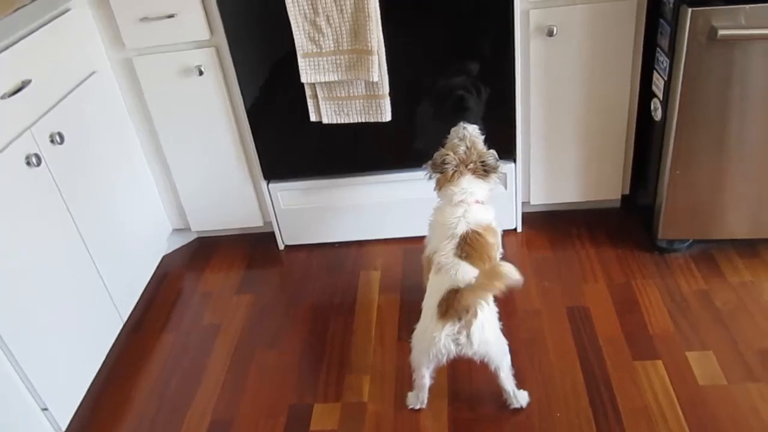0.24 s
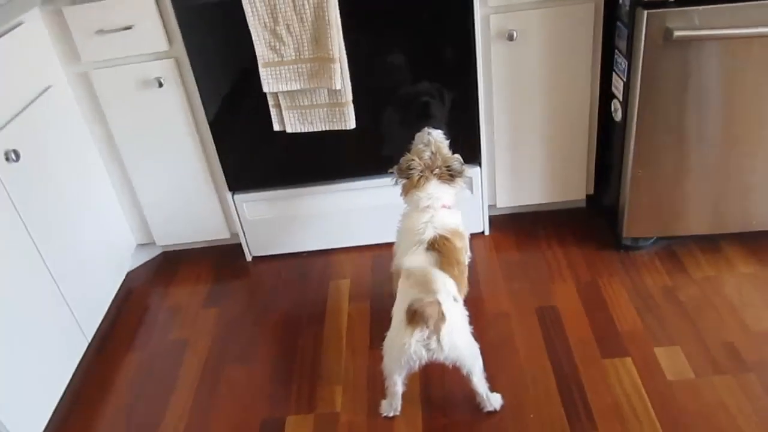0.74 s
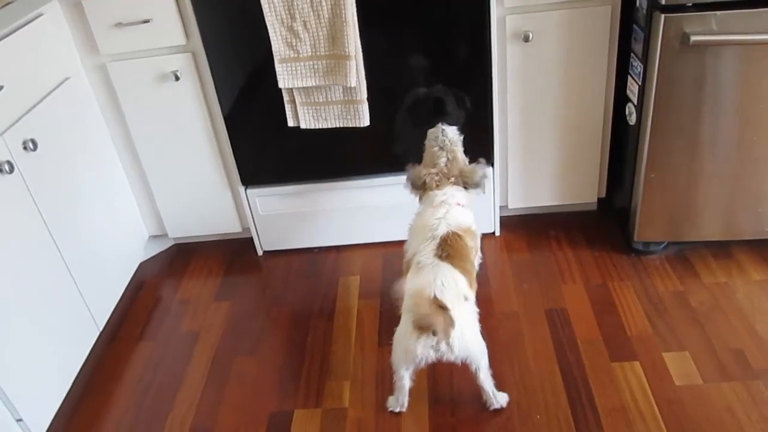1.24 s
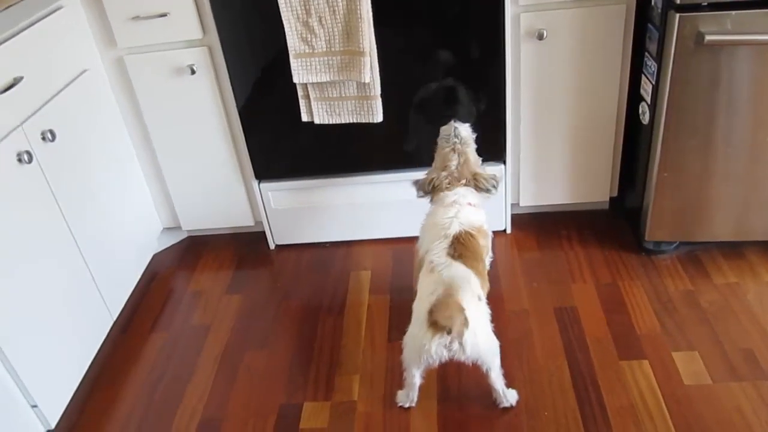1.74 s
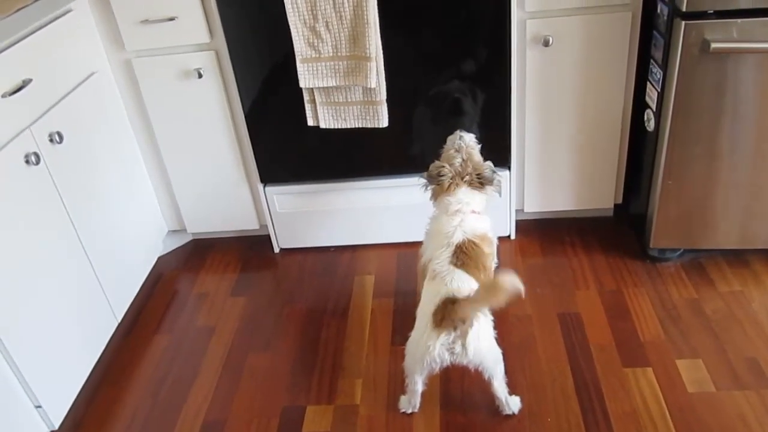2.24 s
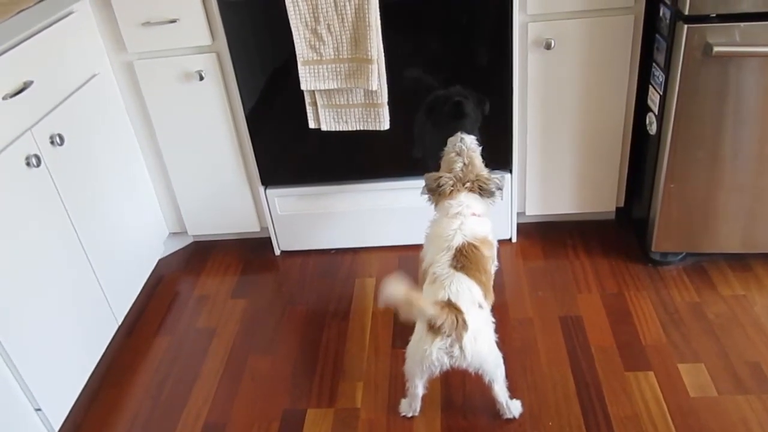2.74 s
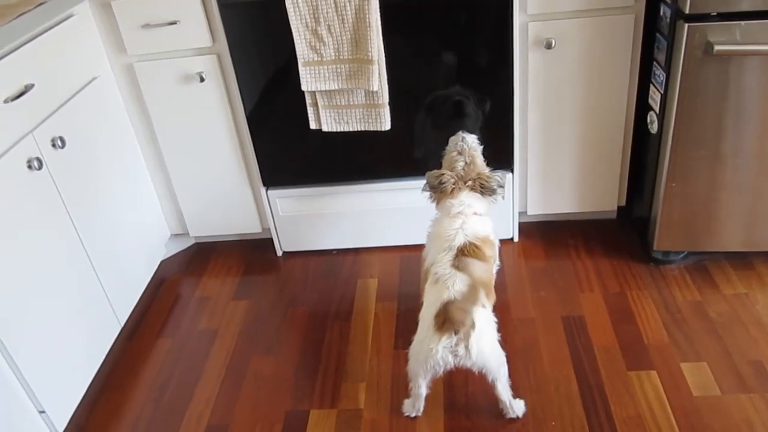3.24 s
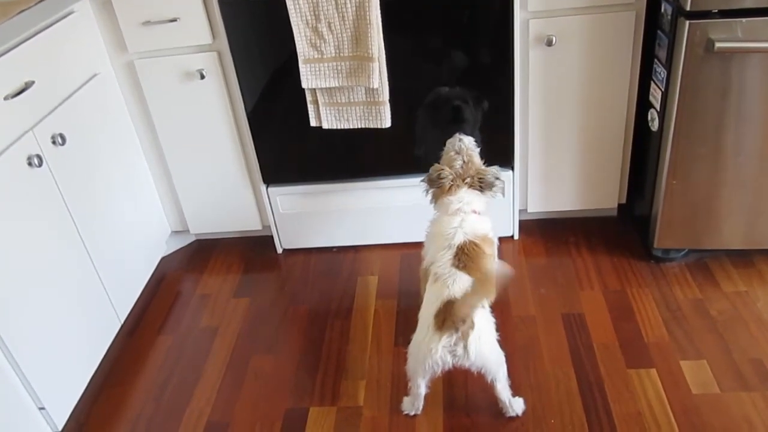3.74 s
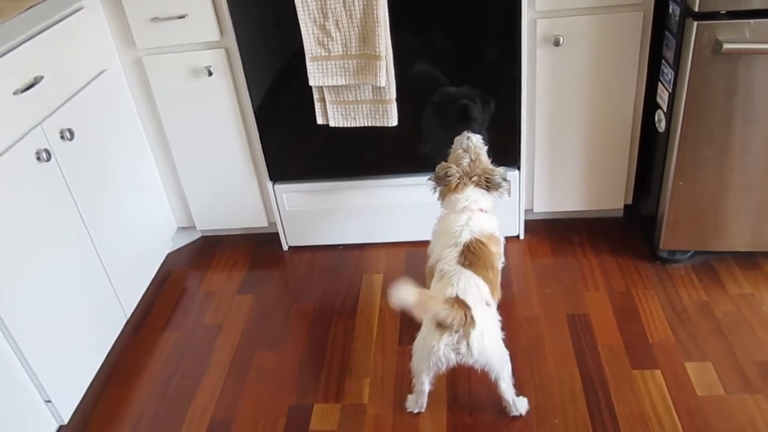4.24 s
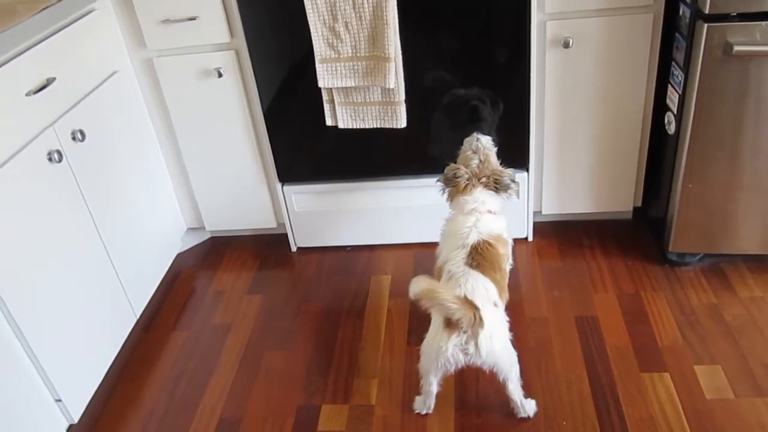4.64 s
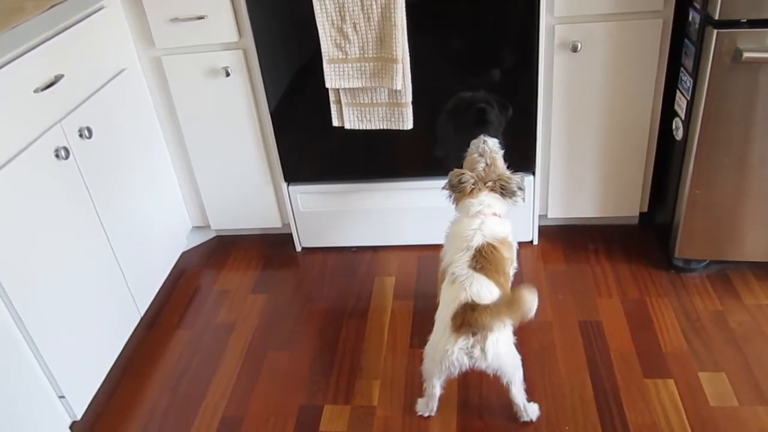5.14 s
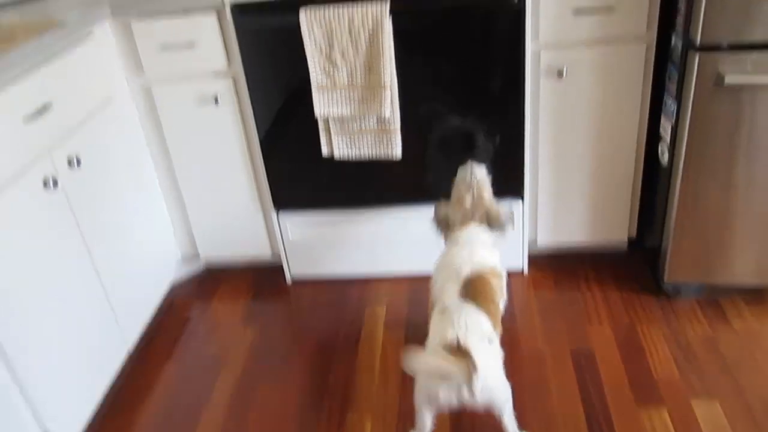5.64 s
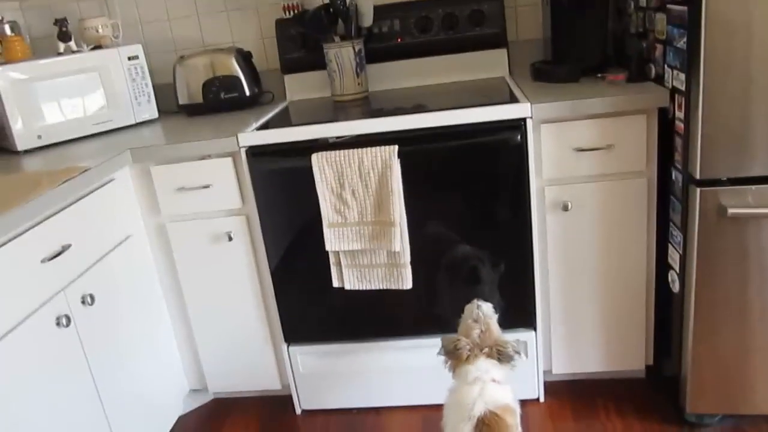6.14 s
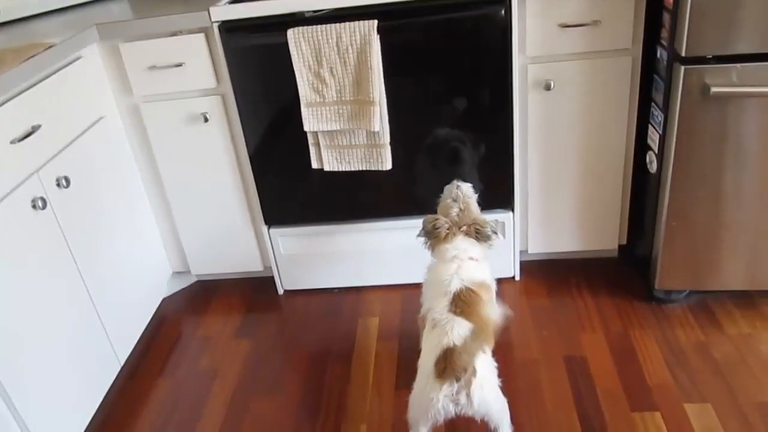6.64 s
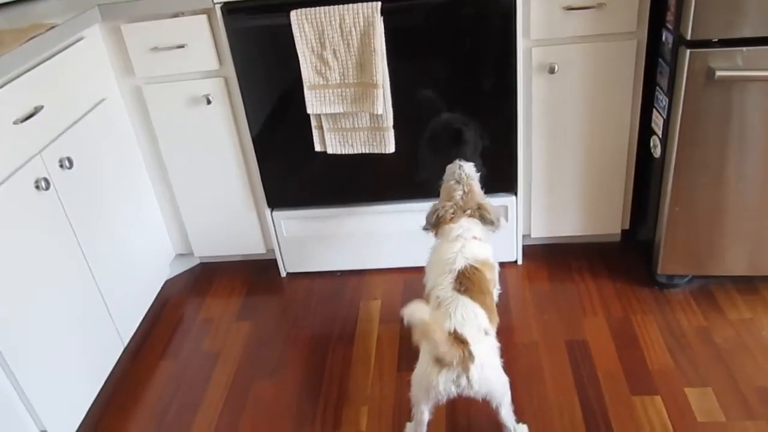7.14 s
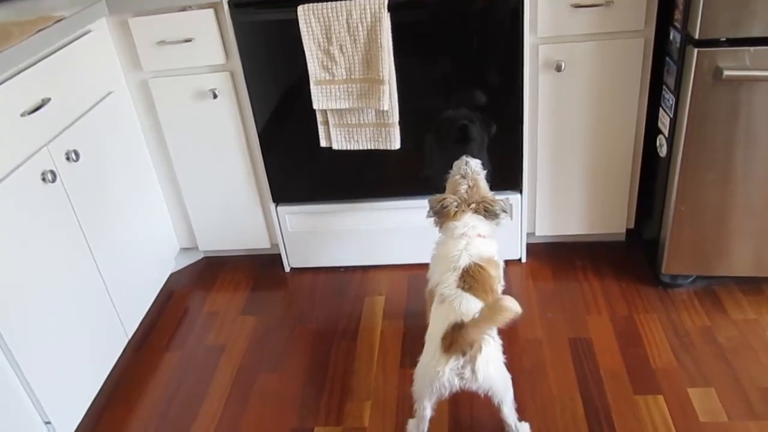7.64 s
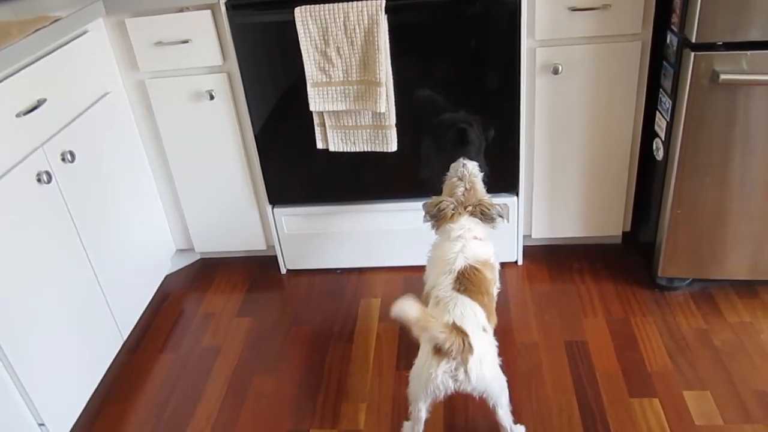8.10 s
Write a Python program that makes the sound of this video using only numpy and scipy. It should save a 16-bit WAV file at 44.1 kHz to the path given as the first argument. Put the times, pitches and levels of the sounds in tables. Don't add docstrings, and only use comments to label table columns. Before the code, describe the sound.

Two soft huffs and faint handling bumps open over low room tone. A small dog growls slowly and creakily, speeding into a rough rattle, and barks hoarsely; a lone bark comes after. Three further growls each end in a loud, raspy bark, ringing briefly off hard kitchen surfaces. Faint breaths and distant low hums fill the gaps, and the last growl stops mid-way. Close, nearly mono handheld pickup.

```python
import sys
import numpy as np
from scipy import signal
from scipy.fft import rfft, irfft, next_fast_len
from scipy.io import wavfile
from scipy.ndimage import uniform_filter1d, minimum_filter1d, map_coordinates

SR = 44100
rng = np.random.default_rng(int(sys.argv[2]) if len(sys.argv) > 2 else 0)


def elevation(decibels):
    levels = np.asarray(decibels, float)
    return 10 ** (levels / 20)


def to_wav(s):
    ch = np.atleast_2d(s).T
    pcm = np.round(np.clip(ch, -1, 1) * 32767)
    wavfile.write(sys.argv[1], SR, pcm.astype(np.int16))


N = 369116

# time in seconds, effort in dB, lips (-1 drawn back to 1 rounded), lip resonance in Hz.
GROWLS = [
    [(0.678, -41, -2, 1450), (0.86, -39, -2.1, 1415), (1.06, -22, -0.46, 1450), (1.2, -35.5, 0.83, 1526),
     (1.255, -19, 0.036, 1580)],
    [(2.345, -42.5, -0.3, 1730), (2.4, -31, -0.014, 1780), (2.79, -27.5, 1, 1450), (2.815, -18, 0.71, 1382),
     (2.89, -23, 0.98, 1300), (2.95, -23.5, 0.94, 1355), (3.35, -27.5, 0.81, 1372),
     (3.435, -22, 0.49, 1328)],
    [(4.093, -35, 0.19, 1420), (4.3, -26.5, 0.15, 1350), (4.45, -24, -0.22, 1390), (4.74, -25, 0.22, 1590),
     (4.92, -22.5, 0.93, 1604), (5.5, -20.5, 0.89, 1482), (5.675, -19.5, 0.93, 1505)],
    [(6.28, -39, -2, 1450), (6.39, -27.5, -0.57, 1450), (6.64, -25, -1.68, 1450), (6.9, -23.5, -0.3, 1437),
     (7.04, -25.5, 0.82, 1444)],
    [(7.668, -35, -2, 1450), (7.76, -32.5, -1.84, 1450), (7.9, -29, -2.3, 1394), (7.96, -25, -1, 1400),
     (8.03, -32, -1.5, 1420), (8.15, -26, -0.6, 1450), (8.27, -22, 0.1, 1460), (8.37, -23.5, 0.85, 1484)],
]


def unit(x):
    return x / np.sqrt(np.mean(x ** 2) + 1e-20)


def along(points, hz):
    f, v = np.transpose(points)
    return np.interp(np.log(hz + 1), np.log(f + 1), v)


def curves(rows):
    s, *cols = np.transpose(rows)
    return [np.interp(np.arange(N) / SR, s, c) for c in cols]


def spans(calls):
    return [(c[0][0], c[-1][0]) for c in calls]


def wobble(rate):
    return map_coordinates(rng.standard_normal(int(N * rate / SR) + 4), [np.arange(N) * rate / SR])


def sounding(times, attack_s, release_s):
    t = np.arange(N) / SR
    total = 0
    for start, end in times:
        rise = (t - start) / attack_s + 0.034
        fall = 1 - (t - end) / release_s
        total = total + (t >= start) * np.clip(np.minimum(rise, fall), 0, 1)
    return total


def filtered(x, response):
    m = next_fast_len(N + SR // 2)
    return irfft(rfft(x, m) * response(np.fft.rfftfreq(m, 1 / SR)), m)[..., :N]


def modes(table, f):
    total = 0
    for k, (centre, width, db) in enumerate(table):
        ring = 1j * f * width / (centre * centre - f * f + 1j * f * width)
        total = total + (-1) ** k * elevation(db) * ring
    return total


def tract(x, table, low_hz, high_hz):
    def response(f):
        low_cut = (1j * f / (1j * f + low_hz)) ** 2
        return modes(table, f) * low_cut / (1 + 1j * f / high_hz) ** 3
    return unit(filtered(x, response))


def gliding(x, hz, width_hz):
    turn = np.exp(2j * np.pi * np.cumsum(hz) / SR)
    pole = np.exp(-np.pi * width_hz / SR)
    return unit(np.real(turn * signal.lfilter([1], np.convolve([1, -pole], [1, -pole]), x / turn)))


def throat(rate_hz, marked, jitter, scatter_db, breath, puff_s):
    cycles = np.cumsum(rate_hz) / SR
    exact = np.array([int(s * SR) for s, db in marked])
    for i in np.sort(exact):
        cycles[i:] -= cycles[i] % 1
    at = np.flatnonzero(np.diff(np.floor(cycles)) > 0)
    luck = rng.standard_normal((4000, 2))[:len(at)]
    late = np.abs(luck[:, 0] * jitter[at]) * SR / rate_hz[at]
    pulses = np.bincount(np.minimum(at + late.astype(int), N - 1), elevation(scatter_db * luck[:, 1]), N)
    for i in exact:
        pulses[i - int(.6 * SR / rate_hz[i]):i] = 0
    pulses[exact] = elevation([db for s, db in marked])
    puffs = signal.lfilter([1], [1, -np.exp(-1 / (puff_s * SR))], pulses)
    air = puffs * rng.standard_normal(N) / np.sqrt(rate_hz)
    pulses = pulses / np.sqrt(rate_hz)
    return np.sqrt(1 - breath) * unit(pulses) + np.sqrt(breath) * unit(air)


def background(loud):
    # frequency in Hz, level in dB per Hz.
    tone_colour = [(12, -51.5), (20, -1.5), (95, -8.5), (157, -8), (204, -6), (280, -5), (395, -10.5),
                   (475, -7.5), (969, -21.5), (1690, -23), (2140, -27.5), (3100, -27), (9300, -35),
                   (11000, -39.5), (14300, -47.5), (22000, -120)]
    # frequency in Hz, level in dB per Hz.
    rumble_colour = [(12, -41), (20, -18.5), (64, 6), (97, 3), (160, 1.5), (210, -27), (350, -120)]
    # time in seconds, level in dB.
    thumps = [
        (0.301, -44),
        (0.751, -38.5),
        (1.629, -57),
    ]
    t = np.arange(N) / SR
    level_db = 10 * np.log10(np.abs(uniform_filter1d(loud ** 2, 900)) + 1e-12)
    recovery_db = 11 * t
    duck_db = np.maximum(np.maximum.accumulate(1.89 * (level_db + 16) + recovery_db) - recovery_db, 0)
    tone = unit(filtered(rng.standard_normal(N), lambda f: elevation(along(tone_colour, f)))) * elevation(-50 - duck_db)
    rumble = unit(filtered(rng.standard_normal(N), lambda f: elevation(along(rumble_colour, f))))
    strain = elevation(-46.5) * sounding(spans(GROWLS), 0.54, 0.21)
    hands = sum(elevation(db) * (t > s) * np.exp(-np.abs(t - s) / 0.12) for s, db in thumps)
    return tone + rumble * (elevation(-64 - duck_db) + elevation(-4.5) * (strain + hands))


def drones():
    # start in seconds, end in seconds, pitch in Hz, pitch wander in Hz, level in dB.
    hums = [
        (3.55, 4.85, 77, 1.2, -51),
        (5.904, 6.716, 123, 6, -61),
        (7.125, 7.81, 129.1, 6, -66),
    ]
    t = np.arange(N) / SR
    total = 0
    for start, end, hz, width, db in hums:
        swell = np.sin(np.pi * np.clip((t - start) / (end - start), 0, 1)) ** 0.5
        total = total + elevation(db) * swell * np.sin(2 * np.pi * np.cumsum(hz + width * wobble(11)) / SR)
    return total


def huffs():
    # start in seconds, level in dB, fading time in seconds.
    puffs = [
        (0.076, -46, 0.019),
        (0.369, -44.5, 0.03),
        (2.025, -40.5, 0.024),
        (3.787, -46, 0.029),
        (6.006, -53.5, 0.11),
        (7.338, -51, 0.045),
    ]
    t = np.arange(N) / SR
    shape = 0
    for start, db, length in puffs:
        age = np.maximum(t - start, 0)
        shape = shape + elevation(db) * (1 - np.exp(-age / 0.0063)) * np.exp(-age / length)
    # frequency in Hz, width in Hz, level in dB.
    mouth = [(720, 53, 12), (1920, 180, -1.5), (2200, 110, 1.5), (3380, 260, -4.5), (7800, 1100, -14)]
    return shape * tract(rng.standard_normal(N), mouth, 300, 30000)


def growl():
    # frequency in Hz, width in Hz, level in dB.
    chest = [(214, 63, -5.5), (433.6, 145, -2.5), (668, 120, 5.5), (853, 74, -4.5)]
    # frequency in Hz, width in Hz, level in dB.
    palate = [(1000, 220, 16), (3270, 150, 1), (3810, 130, 2)]
    # frequency in Hz, width in Hz, level in dB.
    breath_bands = [(3066, 580, 14), (3500, 1900, 8.5)]
    # time in seconds, extra level in dB.
    catches = [(.718, -2), (.757, 1), (.8, 1.5), (.876, 8.5), (.996, -6.5), (2.378, 1.5), (2.702, 0.5),
               (2.806, 4), (2.886, 6.5), (2.9, 2), (2.93, 0.5), (3.202, 4.5), (3.267, 7), (4.173, 3.5),
               (4.306, 5), (4.322, 1), (4.394, 4.5), (4.423, 2), (4.44, 2.5), (4.499, 1), (4.582, 5.5),
               (4.655, 0), (4.703, 2.5), (4.718, 8), (5.127, -0.5), (6.305, -1.5), (6.708, 4), (7.753, 7.5),
               (7.857, 3.5), (7.955, 0.5), (8.04, 5), (8.108, 10.5), (8.131, 2.5)]
    # tongue in Hz at the start, at the end, then three rasp bands in Hz.
    mouths = [(2300, 2080, 6950, 8300, 9800), (1960, 2850, 7050, 7850, 9000),
              (1980, 2450, 6900, 7800, 9230), (2110, 2110, 6700, 8050, 9550),
              (2170, 2100, 6850, 8400, 10500)]
    # time in seconds, resonance in Hz.
    larynx = [
        [(0.7, 587), (0.756, 634), (1.072, 596), (1.112, 640), (1.18, 540), (1.224, 506), (1.25, 524)],
        [(2.36, 654), (2.58, 566), (2.61, 513), (2.752, 616), (3.292, 582), (3.354, 505), (3.43, 609)],
        [(4.1, 620), (4.546, 670), (4.58, 717), (4.698, 607), (4.75, 708), (4.83, 586), (5.67, 580)],
        [(6.29, 671), (6.79, 615), (6.864, 698), (6.974, 615), (7.04, 626)],
        [(7.68, 680), (7.832, 584), (7.864, 650), (8.218, 599), (8.314, 705), (8.36, 696)],
    ]
    # time in seconds, level in dB.
    tongue_shows = [(.68, -3), (.98, -2), (1.1, -15), (2.35, 8), (2.63, 11), (2.68, -5.5), (3.4, -4),
                    (4.1, 2.5), (4.4, -0.5), (4.7, -8.5), (4.86, 3), (4.95, -3), (5.67, -0.5), (6.28, 3.5),
                    (6.7, -3), (7.04, -3), (7.67, 3.5), (7.9, 0), (8.02, -6), (8.37, 9)]
    first_hz = [25.083, 33.08, 40.21, 42.9, 35.04]
    # palate ring, whole rasp, highest rasp band, all in dB.
    palate_shows = [4, -1.5, 4, 6, 5.5]
    rasp_shows = [0.5, -1.9, 0.74, 1.4, 1.5]
    top_rasp_shows = [0, 0, 4.5, 0.5, 2.5]

    effort_db, lips, lip_hz = curves(np.concatenate(GROWLS))
    times, t = spans(GROWLS), np.arange(N) / SR
    mouth_rows = []
    for span, mouth in zip(times, mouths):
        mouth_rows += [(s, mouth[k], *mouth[-3:]) for k, s in enumerate(span)]
    tongue_hz, *rasp_hz = curves(mouth_rows)
    larynx_hz, = curves(np.concatenate(larynx))
    tongue_db, = curves(tongue_shows)

    starts = np.transpose(times)[0]
    which = np.maximum(np.searchsorted(starts, t) - 1, 0)
    age = np.maximum(t - starts[which], 0)
    full_hz, speed_up_s = 86.26, .5
    rate_hz = full_hz - (full_hz - np.array(first_hz)[which]) * np.exp(-age / speed_up_s)
    jitter = np.clip((rate_hz - 22.63) * .009, 0, .4)
    marked = [(start, 0) for start, end in times] + catches
    source = throat(rate_hz, marked, jitter, scatter_db=1.14, breath=0.35, puff_s=0.021)
    source = source * sounding(times, 1e-4, 0.019)

    pushed = source * elevation(effort_db)
    larynx_ring = gliding(gliding(pushed, larynx_hz, 270), larynx_hz, 260)
    body = 0.5 * (tract(pushed, chest, 150, 1327) + 0.65 * larynx_ring)
    body = body * np.sqrt(np.mean((sounding(times, 1e-4, 0.018) * elevation(effort_db)) ** 2))

    swirl = signal.lfilter([1], [1, -np.exp(-1 / (.005 * SR))], np.abs(source))
    source = unit(source) + 1.1 * unit(swirl * rng.standard_normal(N))
    body = body + elevation(effort_db - 45.5) * tract(source, breath_bands, 2100, 5000)

    bands = []
    for hz in rasp_hz:
        drifting_hz = hz * (1 + .014 * wobble(5))
        band = gliding(gliding(source, drifting_hz, 600), drifting_hz, 600)
        bands.append(elevation(3 * wobble(6.7)) * band)
    low, middle, high = bands
    rasp = low + elevation(-6) * middle + elevation(np.array(top_rasp_shows)[which]) * high

    front = elevation(-47.5 + 23.5 * lips + 3 * wobble(14)) * gliding(source, lip_hz, 150)
    tongue = elevation(-38.5 - 9.5 * lips + tongue_db + 4.7 * wobble(11)) * gliding(source, tongue_hz, 110)
    roof = elevation(-34 + np.array(palate_shows)[which] - 4.5 * lips) * tract(source, palate, 710, 8100)
    rasp = elevation(-45 + np.array(rasp_shows)[which] - 4 * lips) * rasp

    def hollow(f):
        side_cavity = 1 - .75 * np.exp(-((f - 5200) / 900) ** 4)
        return side_cavity / (1 + (f / 10000) ** 24)
    return filtered(body + elevation(effort_db) * (front + tongue + roof + rasp), hollow)


def bark():
    # time in seconds, effort in dB, main resonance in Hz, mouth opening in dB.
    barks = [
        [(1.262, -24.5, 575, -23), (1.278, -14, 635, -20.5), (1.305, -12.5, 625, -9.5),
         (1.345, -22, 606, -12.5), (1.36, -21.5, 569, -8), (1.374, -18, 580, -18), (1.41, -19, 580, -11.5),
         (1.452, -29, 590, -6.5)],
        [(1.745, -33.5, 720, -19), (1.762, -24.5, 768, -11), (1.79, -21, 594, -8.5), (1.835, -17, 651, -16),
         (1.856, -35, 562, -5), (1.888, -21.5, 780.8, -18), (1.915, -26.5, 610, -11), (1.97, -39, 535, -15.5)],
        [(3.443, -18, 624, -14.5), (3.463, -11, 644, -13), (3.486, -20, 559.3, -13), (3.52, -14.5, 651, -9),
         (3.548, -20, 587, -7), (3.564, -19.5, 593, -9), (3.61, -33.5, 596.4, -16)],
        [(5.682, -13, 730, -20), (5.712, -19, 806, -13), (5.74, -18, 580, -7.5), (5.77, -23, 776, -3.5),
         (5.786, -17, 580, -17), (5.818, -20.5, 581.3, -14), (5.865, -30, 573.3, -6), (5.895, -42, 635, -3)],
        [(7.048, -32, 696.4, -40), (7.058, -15.5, 635.7, -22), (7.095, -15.5, 595, -10),
         (7.135, -23.5, 639.7, -2.5), (7.158, -14.5, 575, -20), (7.19, -29.5, 580, 3), (7.225, -22, 580, -15),
         (7.255, -37.5, 580, -6)],
    ]
    # frequency in Hz, width in Hz, level in dB.
    jaw = [(447, 213, -0.5), (598, 522, -2), (864, 275, -8.5)]
    # frequency in Hz, width in Hz, level in dB.
    gape = [(939, 342, 3), (1450, 836, 0.5), (2060, 2100, -8)]
    # frequency in Hz, width in Hz, level in dB.
    teeth = [(3300, 200, -6), (3850, 220, -6), (4660, 200, 2), (6200, 320, -4), (7050, 400, -4),
             (7900, 700, -2), (8900, 700, -3), (11100, 800, -6), (13100, 300, -8)]
    # share of its length, rasp in dB, cheek ring in dB.
    course = [(0, -51, -59), (.12, -24.5, -56), (0.28, -16, -46), (.5, -27, -21.5), (0.578, -23, -30),
              (.78, -33, -57), (1.001, -34.5, -51)]
    # rasp over the shared course, its gain from start to end, both in dB.
    raspiness_db = [-1.6, -3.5, 2, 1, 2]
    rasp_bloom_db = [2.3, 3.6, 2.6, 3.4, 4.8]
    # time in seconds, resonance in Hz.
    gaping = [
        [(1.27, 1220), (1.34, 1038), (1.39, 1130), (1.45, 1350)],
        [(1.75, 1206), (1.8, 1435), (1.825, 1030), (1.96, 1000)],
        [(3.45, 1346), (3.5, 990), (3.55, 1240), (3.61, 1023)],
        [(5.69, 1550), (5.745, 1213), (5.784, 1002), (5.832, 1195), (5.89, 1014)],
        [(7.06, 1570), (7.095, 1620), (7.12, 1020), (7.19, 1260), (7.25, 1053)],
    ]
    # time in seconds, level in dB.
    groans = [
        (1.275, -47.5),
        (1.501, -49),
        (1.79, -51.5),
        (3.665, -47),
        (5.9, -52),
        (7.279, -45.5),
        (7.341, -67),
    ]

    effort_db, main_hz, gape_db = curves(np.concatenate(barks))
    mouth_hz, = curves(np.concatenate(gaping))
    times, t = spans(barks), np.arange(N) / SR
    rows = []
    for (start, end), more, bloom in zip(times, raspiness_db, rasp_bloom_db):
        for u, rasp, cheek in course:
            rows.append((start + u * (end - start), u, rasp + more + bloom * (u - .5), cheek))
    share, rasp_db, cheek_db = curves(rows)

    rate_hz = 316 * (1.12 - .3 * share)
    marked = [(start, -6) for start, end in times]
    source = throat(rate_hz, marked, np.full(N, .07), scatter_db=2.5, breath=.25, puff_s=.002)
    push = elevation(effort_db) * sounding(times, 0.01, 0.019)
    source = source * push

    body_ring = 0.81 * gliding(source, main_hz, 100) + 0.94 * tract(source, jaw, 317, 1336)
    body = tract(body_ring, [(580, 520, 0)], 360, 4400)
    opening = tract(source, gape, 540, 2060) + 0.63 * gliding(source, mouth_hz, 270)
    hiss = tract(tract(source, teeth, 1200, 19000), teeth, 1300, 19000)
    cheek_ring = gliding(source, np.full(N, 2815), 140)
    bright = elevation(rasp_db + 3 * wobble(45)) * hiss + elevation(cheek_db) * cheek_ring
    voice = body + elevation(gape_db + 1) * opening + bright * sounding(times, 0.053, .1)

    tone = np.sin(2 * np.pi * np.cumsum(main_hz * (1 + .03 * wobble(60))) / SR)
    clear = push * elevation(-0.5 - 0.89 * (gape_db + 15)) * tone
    swell = sum(elevation(db) * np.exp(-((t - s) / 0.044) ** 2) for s, db in groans)
    groan = swell * gliding(rng.standard_normal(N), np.full(N, 220), 82)
    return voice * np.sqrt(np.mean(push ** 2)) + clear + groan


def kitchen(x):
    # frequency in Hz, time to fall by 60 dB in seconds.
    decay = [(150, 0.66), (600, 0.53), (1500, 0.65), (4500, 0.54), (9000, 0.52)]
    hop, out = SR // 3, np.zeros((2, N + 3 * SR))
    fade = np.sin(np.pi * np.arange(2 * hop) / (2 * hop))
    padded = np.pad(x, (hop, 2 * hop))
    for start in range(0, N + hop, hop):
        hz, t, z = signal.stft(rng.standard_normal((2, SR)), SR, nperseg=256)
        dying = z * elevation(-60 * t / along(decay, hz)[:, None])
        tail = signal.istft(dying, SR, nperseg=256)[1][:, :SR]
        piece = padded[start:start + 2 * hop] * fade
        wet = signal.fftconvolve(piece[None], tail / np.linalg.norm(tail[0]), axes=1)
        out[:, start:start + wet.shape[1]] += wet
    return np.pad(out, ((0, 0), (260, 0)))[:, hop:hop + N]


def thinned_treble(x):
    # start in seconds, end in seconds, extra threshold in dB.
    thinner_spells = [(2.8, 3.06, 4), (4.2, 4.45, 2), (4.58, 5.6, 3), (7.7, 8.31, 2)]
    window = np.sin(np.pi * (np.arange(2048) + .5) / 2048)
    hz, t, z = signal.stft(x, SR, window=window, nperseg=2048)
    mid = np.abs(z.mean(axis=0)) + 1e-12
    level_db = 10 * np.log10((mid ** 2).sum(axis=0))
    band_waver = np.repeat(rng.standard_normal((33, len(t))), 32, axis=0)[:len(hz)]
    waver = rng.standard_normal(len(t)) + band_waver
    gate_db = -87.5 + .8 * (level_db + 21) + 3 * waver
    gate_db = gate_db + sum(db * (t > start) * (t < end) for start, end, db in thinner_spells)
    round_up = 1.6
    step = round_up * elevation(gate_db + 7 * (hz > 9700)[:, None])
    stepped = np.floor(mid / step + 1 - 1 / round_up) * step / mid
    keep = np.where((hz < 2400)[:, None], 1, stepped)
    return signal.istft(z * keep, SR, window=window, nperseg=2048)[1][:, :N]


def scene():
    # frequency in Hz, width in Hz, level in dB.
    standing = [(230, 48, 4.5), (401.6, 17, 3.5), (454, 92, -2), (575, 10, 2.5), (640, 12.8, 3),
                (797, 25, 9), (917.5, 32, 9.5), (958, 6.1, 12), (1026.3, 25.3, 10.5), (1072, 8, 1),
                (1260, 3, -4.5), (1503, 3.7, -1), (471, 36, -3.5)]
    # frequency in Hz, level in dB.
    port_width = [(700, -38), (1200, -29), (3000, -19.5), (10000, -11.5)]
    # frequency in Hz, left minus right in dB.
    lean = [(750, 0), (1100, -.9), (2500, -1.5), (8000, -1.5), (12000, -.6)]
    dog = huffs() + growl() + bark()
    wet, other = kitchen(dog)
    mid = elevation(-1.24) * dog + elevation(-0.88) * wet
    mid = filtered(mid, lambda f: 1 + sum(modes([wave], f) for wave in standing)) * elevation(-1.5)
    side = filtered(other, lambda f: elevation(along(port_width, f)) * f ** 4 / (f ** 4 + 600 ** 4))
    pair = np.array([mid + side, mid - side])
    pair = filtered(pair, lambda f: elevation(np.outer([.5, -.5], along(lean, f))))
    return background(mid) + drones() + pair


def roll_off(x):
    return signal.sosfilt(signal.butter(12, 13260, fs=SR, output="sos"), x)


def record(dry):
    needed = np.minimum(1, .92 / (np.abs(dry).max(axis=0) + 1e-9))
    gain = uniform_filter1d(minimum_filter1d(needed, size=400), size=200)
    gain = gain * np.clip((N - np.arange(N)) / (.002 * SR), .3, 1)
    mix = thinned_treble(dry * gain)
    return roll_off(mix)


dry = scene()
out = record(dry)
to_wav(out)
```